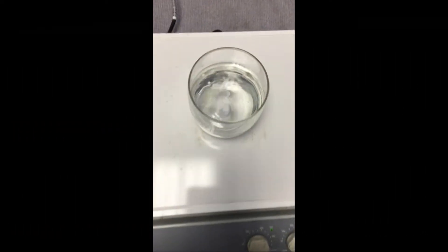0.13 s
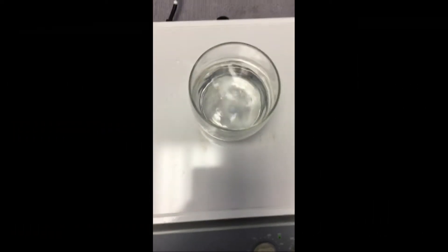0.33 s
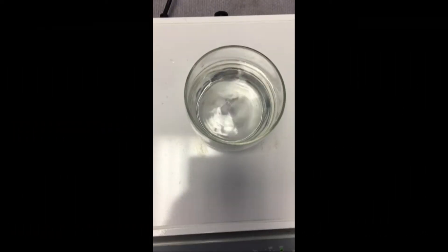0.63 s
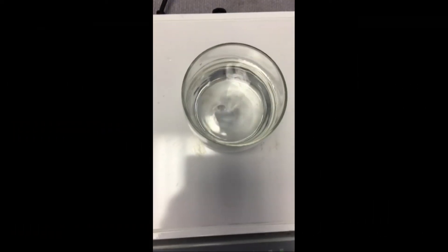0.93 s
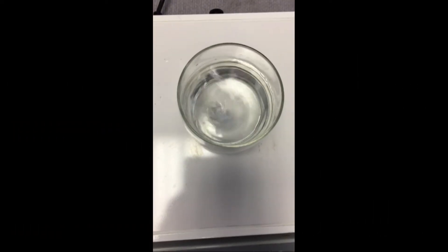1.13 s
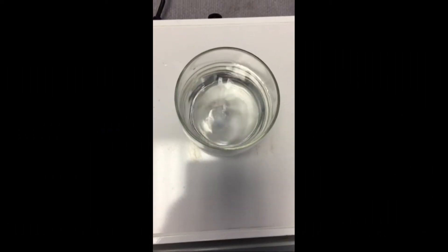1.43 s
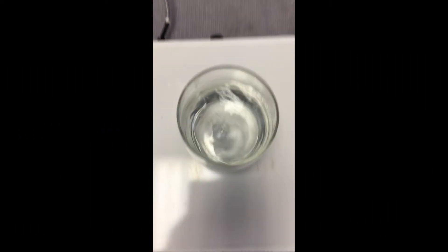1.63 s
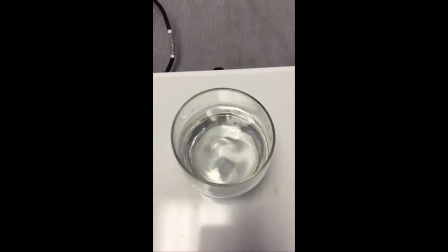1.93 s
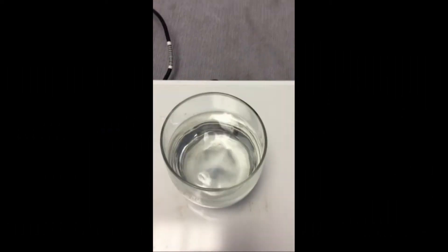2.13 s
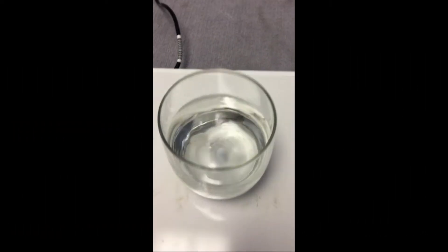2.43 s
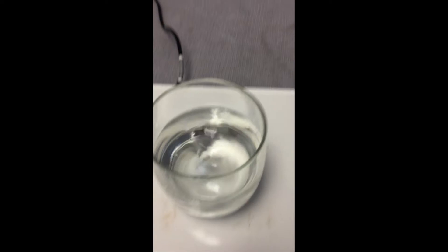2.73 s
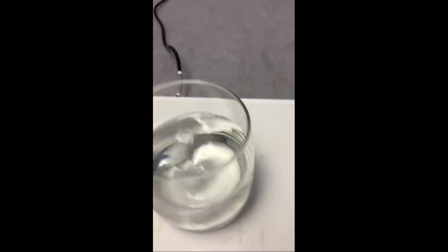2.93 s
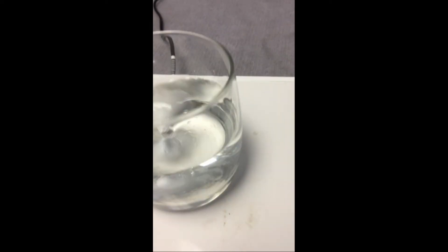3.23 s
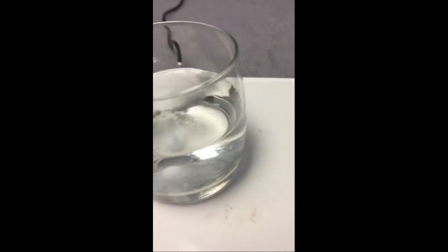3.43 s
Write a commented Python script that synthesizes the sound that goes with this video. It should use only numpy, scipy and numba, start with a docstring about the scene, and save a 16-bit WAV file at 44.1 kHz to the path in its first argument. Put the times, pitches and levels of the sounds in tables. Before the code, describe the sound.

Water gurgles in a glass as a magnetic stirrer bar rattles and ticks in quick, uneven bursts. Bubbles chirp and gulp in two surges, the second louder, over a faint motor hum, heard close in a quiet room.

```python
"""A quiet room, close to a magnetic stirrer spinning its bar in a glass of water.
The bar scrapes and ticks on the glass in short bouts, skidding about every half turn, while the motor hums.
The vortex swallows air: tiny bubbles chirp, big ones gulp, and the bar whips them into froth."""
import sys
import numpy as np
from scipy import signal
from scipy.fft import rfft, irfft
from scipy.io import wavfile
from scipy.ndimage import uniform_filter1d
from numba import njit

SR = 44100
rng = np.random.default_rng(int(sys.argv[2]) if len(sys.argv) > 2 else 0)


def generate_wav(signal):
    """Clip the signal to [-1, 1] and save it as 16-bit WAV at the path in sys.argv[1]."""
    frames = np.transpose(np.atleast_2d(signal))
    scaled = np.clip(frames, -1, 1) * 32767
    pcm = np.round(scaled).astype(np.int16)
    wavfile.write(sys.argv[1], SR, pcm)


N = 158760
TIME = np.arange(N) / SR
HALF_TURN_HZ = 35.85


# body of the glass and the plate under it: (frequency [Hz], gain [dB])
PLATE_BODY = [(90, -17), (170, -2.5), (360, 3), (480, -8.5), (590, 1.5), (690, -1), (790, -14.5),
              (1050, -9), (1160, 1), (1420, -2.5), (1750, -7.5), (2080, -31.5), (3500, -26), (15000, -74)]

def scrape(knocks, grit=0.52, trim_db=2.5):
    """The dragging bar's knocks and fine grit ring the glass and the plate."""
    push = unit(knocks) + grit * rng.standard_normal(N)
    return undb(trim_db) * unit(colour(push, PLATE_BODY)) * bout_envelope("scrape")


# bouts of the bar dragging on the glass: (start [s], end [s], scrape level [dB], froth level [dB])
DRAG_BOUTS = [(0, 0.131, -49.5, -41), (0.181, 0.201, -53.5, -45.5), (0.237, 0.309, -49.5, -56),
              (0.35, 0.422, -48.5, -65), (0.46, 0.521, -50, -87), (0.602, 0.762, -52, -73),
              (0.789, 0.864, -47.5, -55), (0.914, 0.945, -50.5, -47.5), (0.989, 1.033, -46.5, -41.5),
              (1.082, 1.202, -52, -41.5), (1.253, 1.309, -47, -37), (1.338, 1.403, -48.5, -45),
              (1.458, 1.59, -49.5, -47.5), (1.65, 1.719, -46, -41.5), (1.764, 1.829, -50, -50),
              (1.852, 1.972, -49.5, -51.5), (2.016, 2.092, -48.5, -53.5), (2.155, 2.217, -51, -60.5),
              (2.262, 2.326, -49.5, -70), (2.376, 2.438, -50.5, -91), (2.484, 2.62, -54, -86),
              (2.628, 2.88, -49, -62), (2.905, 3.051, -47, -42.5), (3.099, 3.143, -45.5, -33),
              (3.189, 3.367, -45.5, -43), (3.408, 3.478, -49, -48), (3.51, 3.588, -48, -56)]

def bout_envelope(layer, attack_s=0.0038, release_s=0.013):
    """The "scrape" or "froth" layer opens as the bar catches and dies away as it lets go."""
    envelope = np.zeros(N)
    for start, end, scrape_db, froth_db in DRAG_BOUTS:
        gain = undb(scrape_db if layer == "scrape" else froth_db)
        attack = np.clip((TIME - start) / attack_s + .5, 0, 1)
        release = np.exp(-np.maximum(TIME - end, 0) / release_s)
        envelope = np.maximum(envelope, gain * attack * release)
    return envelope


def chatter(knocks_per_s=215, scatter_db=4.5):
    """Quick, uneven knocks of the dragging bar."""
    gap, force = rng.standard_normal((N // 100, 2)).T
    at = (np.cumsum(np.exp(.3 * gap)) * SR / knocks_per_s).astype(int)
    strength = undb(scatter_db * np.clip(force, -2, 2))
    return np.bincount(at[at < N], strength[at < N], N)


# sharp taps of the bar on the glass: (time [s], level [dB])
HARD_TAPS = [(1.004, -22), (1.026, -33.5), (1.091, -23.5), (1.369, -40), (1.817, -31.5), (2.041, -36),
             (2.182, -35), (2.264, -37), (2.624, -30.5), (2.651, -35), (2.675, -32.5), (2.724, -32.5),
             (2.751, -25.5), (2.777, -26.5), (2.804, -29), (2.828, -20.5), (3.005, -23.5), (3.049, -21),
             (3.158, -33.5)]

def taps(ring_s=0.0029, rebound_s=0.0082, cushion_hz=4940.0):
    """Hard taps and jolts from the chirping bubbles hit and rebound; water softens them to one band."""
    jolts = [(s - CHIRP_SWELL_S, db - 14) for s, _, db in TINY_BUBBLES]
    push = np.zeros(N)
    for s, db in list(HARD_TAPS) + jolts:
        add(push, s, undb(db - 4) * burst(ring_s / 2))
        add(push, s + rebound_s * (.5 + rng.random()), undb(db - 17) * burst(ring_s))
    return 2 * resonate(push, np.full(N, cushion_hz), 0.94)


# skids grow louder over the first second; added to each bout's scrape level: (time [s], gain [dB])
SKID_LEVEL = [(.3, -9.5), (.8, -4.5), (3.3, -5)]

def skids(gap_s=0.026, ring_s=0.0029):
    """The bar grazes the glass about every half turn of a bout."""
    push = np.zeros(N)
    for start, end, scrape_db, _ in DRAG_BOUTS:
        db = scrape_db + curve(SKID_LEVEL, start)
        for k, size in enumerate(rng.standard_normal(10)):
            s, touch = start + (k + size / 10) * gap_s, burst(ring_s)
            if s < end:
                add(push, s, 2 * undb(db + 2 * size) * touch)
    return push


# ringing modes of the glass: (frequency [Hz], level [dB])
GLASS_MODES = [(3190, -0.5), (3900, 0), (4400, 5), (5010, -2), (5530, -2), (6870, -4), (8080, -10),
               (11700, -11.5)]

def ticks(push, width=0.097, scatter_db=6):
    """Each touch rings the glass in its own colour, as the modes vary with the spot struck."""
    modes = 0
    for hz, db in GLASS_MODES:
        spot_db = scatter_db * np.tanh(drift(HALF_TURN_HZ))
        modes += ring(push * undb(db + spot_db), hz, width)
    return np.std(push) * unit(modes)


# bright chirps: (peak time [s], pitch [Hz], level [dB])
TINY_BUBBLES = [(0.506, 4900, -43), (.606, 4800, -41.5), (.655, 4670, -40.5), (.704, 4528, -37),
                (.756, 4750, -29), (.787, 4630, -36), (.809, 4620, -33.5), (0.836, 4550, -37.5),
                (0.863, 4500, -35.5), (.915, 4450, -31.5), (0.983, 4000, -20), (1.005, 5130, -29),
                (1.035, 3930, -26.5), (1.096, 4280, -23.5), (2.806, 3800, -21), (2.83, 4050, -20.5),
                (2.844, 4500, -25.5), (2.884, 3910, -19.5), (2.909, 3890, -12.5), (2.935, 4110, -15.5),
                (2.994, 5230, -22.5), (3.103, 3800, -26)]
CHIRP_CYCLES, CHIRP_SWELL_S = 3.76, 0.00062

def chirps(trim_db=-1.5):
    """Tiny bubbles pinch off the vortex tip and ring."""
    out = np.zeros(N)
    for s, hz, db in TINY_BUBBLES:
        chirp = bubble(hz, CHIRP_CYCLES, CHIRP_SWELL_S, glide=0.06)
        add(out, s - 2 * CHIRP_SWELL_S, undb(db + trim_db) * chirp)
    return out


# round gulps: (peak time [s], pitch [Hz], level [dB], swell [s])
BIG_BUBBLES = [(0.021, 1300, -31.5, .005), (.065, 1380, -29, .0027), (1.113, 1657, -28, .002),
               (1.126, 1354, -28.5, .002), (1.146, 1696, -25, .003), (1.176, 1647, -24, .004),
               (1.256, 1294, -29.5, .002), (1.273, 1358, -26.5, .006), (1.303, 1360, -24.5, .006),
               (1.462, 1335, -30.5, .006), (1.673, 1892, -34, .0073), (2.955, 1321, -18.5, .005),
               (2.971, 1436, -24, .003), (3.007, 1720, -22.5, .001), (3.032, 1510, -31, .002),
               (3.085, 1528, -30.5, .003), (3.12, 1320, -23.5, .008), (3.144, 1603, -26, .007)]

def gulps(trim_db=-0.5):
    """Big bubbles tear from the vortex and ring lower."""
    out = np.zeros(N)
    for s, hz, db, swell_s in BIG_BUBBLES:
        gulp = bubble(hz, decay_cycles=3.8, swell_s=swell_s, glide=0.066)
        add(out, s - 2 * swell_s, undb(db + trim_db) * gulp)
    return out


# the froth's largest bubbles, higher when chopped finer: (time [s], pitch [Hz])
FROTH_PITCH = [(0, 1403), (.3, 1767), (1.3, 1450), (1.7, 1674), (2.2, 2040), (3.1, 1442), (3.58, 1942)]
# resonances of the bubble cloud: (ratio to that pitch, level [dB])
CLOUD_MODES = [(1.001, 6.5), (1.218, 6), (1.449, 0), (1.95, -8)]

def froth(knocks, grit=0.58, wander=0.076, width=0.042, trim_db=-1):
    """Knocks and churning shake a cloud of bubbles whose resonances slide about and ring on."""
    pitch, envelope = curve(FROTH_PITCH), bout_envelope("froth")
    push = (unit(knocks) + grit * rng.standard_normal(N)) * envelope
    cloud = 0
    for ratio, db in CLOUD_MODES:
        hz = ratio * pitch * np.exp(wander * drift(43.5))
        cloud += undb(db) * unit(ring(push, hz, width))
    return undb(trim_db) * unit(cloud) * np.sqrt(np.mean(envelope ** 2))


# droplets snapping at the surface: (time [s], level [dB])
DROPLETS = [(1.069, -32.5), (1.84, -50), (1.607, -50), (2.339, -48.5), (2.948, -37), (3.159, -38.5)]
# the vortex tip reaches the bar: (start [s], end [s], whistle level [dB])
VORTEX_DIPS = [(1.085, 1.22, -42.5), (2.919, 3.083, -35)]

def spatter(knocks, whistles_per_s=71, whistle_hz=3530, spray_hz=13000):
    """Thin rising whistles where the vortex tip meets the bar, and droplets snapping above it."""
    whistles = np.zeros(N)
    drops = undb(-40) * unit(knocks ** 2) * bout_envelope("froth")  # mist thrown by the knocks
    snap_s = 0.0013
    for s, db in DROPLETS:
        add(drops, s, undb(db) * burst(snap_s))
    for start, end, db in VORTEX_DIPS:
        chances = np.clip(rng.standard_normal((40, 4)), -2, 2)
        for k, (late, pitch, size, spray) in enumerate(chances):
            s, snap = start + (k + late / 2) / whistles_per_s, burst(snap_s)
            if s < end:
                hz = whistle_hz * np.exp(.22 * pitch)
                whistle = bubble(hz, CHIRP_CYCLES, swell_s=0.0012, glide=0.11)
                add(whistles, s, undb(db + 2 * size) * whistle)
                add(drops, s, undb(-59 + 8 * spray) * snap)  # fine spray
    return whistles + 2 * ring(drops, spray_hz, width=6)


# shaft tones: (multiple of the half-turn rate, level [dB])
SHAFT_TONES = [(1, -65.5), (2, -64.5), (3, -54.5)]
# mains tones: (frequency [Hz], level [dB])
MAINS_TONES = [(120, -60), (480, -78)]
# fader ride on the whole hum: (time [s], gain [dB])
HUM_RIDE = [(1.7, 5), (2.5, -0.5)]

def motor_hum(half_turns, waver_db=1.1):
    """Shaft and mains tones make a low bed, each wavering a little in level."""
    tones = [(k * half_turns, db) for k, db in SHAFT_TONES] + [(hz * TIME, db) for hz, db in MAINS_TONES]
    hum = 0
    for cycles, db in tones:
        hum += undb(db + waver_db * drift(3.0)) * np.sin(2 * np.pi * (cycles + rng.random()))
    return np.sqrt(2) * hum * undb(curve(HUM_RIDE))


def reflections(x, echo_db=-9, echo_s=0.0064, tail_db=-16, tail_s=0.039):
    """Quick echoes off the glass and bench, then a faint room tail."""
    t = np.arange(SR // 3) / SR
    response = 0
    for db, decay_s in (echo_db, echo_s), (tail_db, tail_s):
        echo = rng.standard_normal(len(t)) * np.exp(-t / decay_s) * (t > .002)
        response += undb(db) * echo / np.linalg.norm(echo)
    return x + signal.fftconvolve(x, response)[:N]


# EQ of the room tone: (frequency [Hz], gain [dB])
ROOM_EQ = [(25, -43), (42, 0.5), (56, -0.5), (80, -4.5), (250, -10.5), (620, -9.5), (780, -26.5),
           (1030, -29), (1180, -10.5), (1600, -27.5), (2500, -33.5), (9000, -47.5)]

def room_tone(level_db=-52):
    """A soft, dark noise floor under everything."""
    return undb(level_db) * unit(colour(rng.standard_normal(N), ROOM_EQ))


def bubble(hz, decay_cycles, swell_s, glide):
    """A bubble swells, then rings down while its pitch climbs toward hz * (1 + glide)."""
    decay_s = decay_cycles / hz
    t = np.arange(int((2 * swell_s + np.log(1000) * decay_s) * SR)) / SR - 2 * swell_s
    envelope = np.where(t < 0, np.exp(-(t / swell_s) ** 2), np.exp(.5 - np.hypot(.5, t / decay_s)))
    pitch = hz * (1 + glide * np.tanh(t / (2 * decay_s)))
    return envelope * np.sin(2 * np.pi * np.cumsum(pitch) / SR)


def burst(decay_s):
    """A flick of noise that dies away."""
    t = np.arange(SR // 50) / SR
    return rng.standard_normal(len(t)) * np.exp(-(t / decay_s) ** 2)


@njit
def resonate(x, hz, width):
    """Band-pass with a moving centre and a relative width."""
    y, band_state, low_state = np.empty(len(x)), 0., 0.
    for i in range(len(x)):
        g = np.tan(np.pi * hz[i] / SR)
        band = (band_state + g * (x[i] + 1e-18 - low_state)) / (1 + g * (g + width))
        band_state = 2 * band - band_state
        low_state += 2 * g * band
        y[i] = width * band
    return y


def ring(x, hz, width):
    """A resonance with steep skirts."""
    hz = hz * np.ones(N)
    return resonate(resonate(x, hz, float(width)), hz, 0.29)


def colour(x, points):
    """Causal EQ through (frequency [Hz], gain [dB]) points."""
    hz, db = np.array(points).T
    freqs = np.maximum(np.arange(N + 1) * SR / (2 * N), 1)
    gain = undb(np.interp(np.log(freqs), np.log(hz), db))
    cepstrum = irfft(np.log(gain))
    cepstrum[1:N] *= 2
    cepstrum[N + 1:] = 0
    return irfft(rfft(x, 2 * N) * np.exp(rfft(cepstrum)))[:N]


def drift(rate_hz):
    """Smooth random drift with a spread near 1."""
    span = int(SR / rate_hz)
    smoothed = uniform_filter1d(rng.standard_normal(N), span, mode="wrap")
    return unit(uniform_filter1d(smoothed, span, mode="wrap"))


def add(out, start_s, sound):
    """Mix a sound in at its cue."""
    i = int(start_s * SR)
    part = sound[max(-i, 0):max(N - i, 0)]
    out[max(i, 0):max(i, 0) + len(part)] += part


def curve(points, t=TIME):
    return np.interp(t, *np.array(points).T)


def undb(db):
    return 10 ** (np.asarray(db) / 20)


def unit(x):
    return x / np.sqrt(np.mean(x ** 2))


def scene():
    """Bar and water up front with their reflections; motor and room tone behind."""
    half_turns = np.cumsum(HALF_TURN_HZ * (1 + 0.0049 * drift(3.5))) / SR
    knocks = chatter()
    glass = scrape(knocks) + froth(knocks) + gulps() + chirps() + spatter(knocks)
    glass += ticks(taps() + skids())
    return (reflections(glass) + motor_hum(half_turns) + room_tone())[None]


def record(dry):
    """A steep high cut at 16 kHz."""
    return signal.sosfilt(signal.ellip(10, .2, 70, 16000, fs=SR, output="sos"), dry)


dry = scene()
out = record(dry)
generate_wav(out)
```